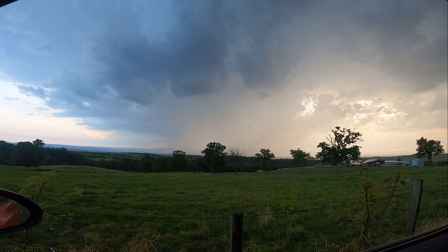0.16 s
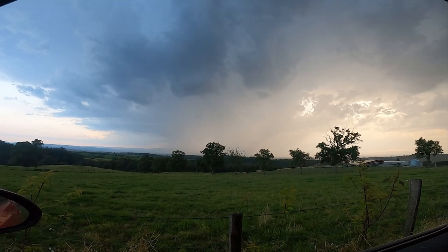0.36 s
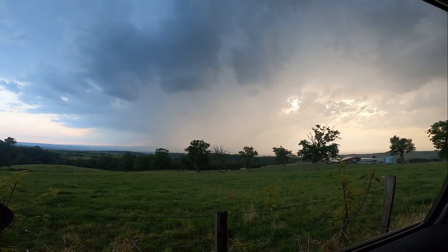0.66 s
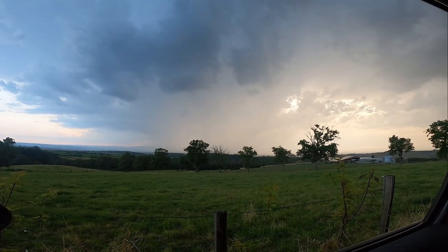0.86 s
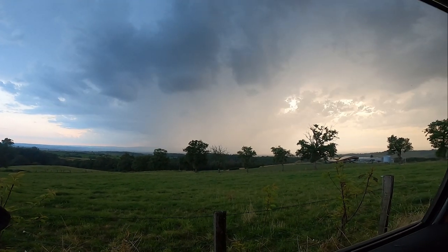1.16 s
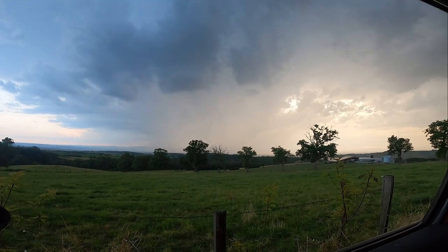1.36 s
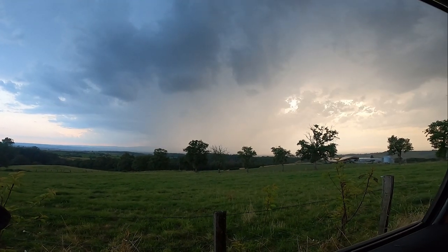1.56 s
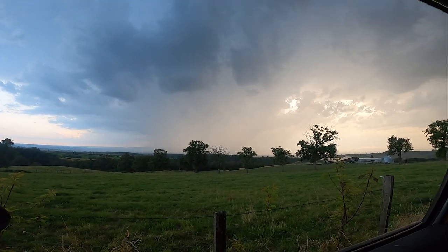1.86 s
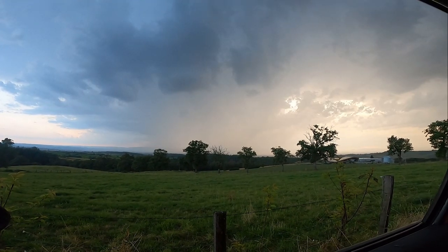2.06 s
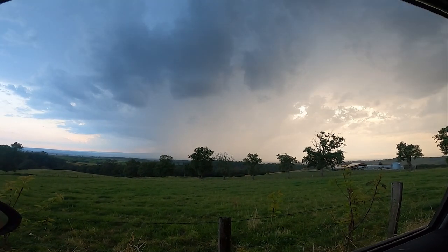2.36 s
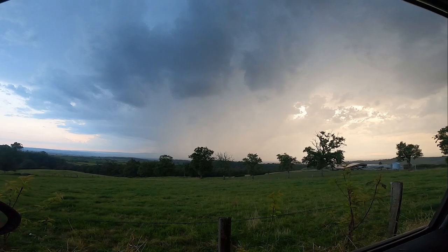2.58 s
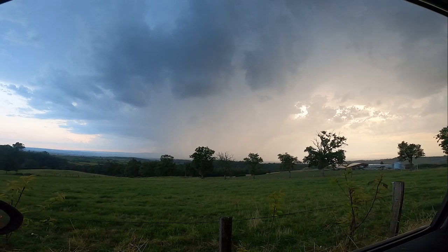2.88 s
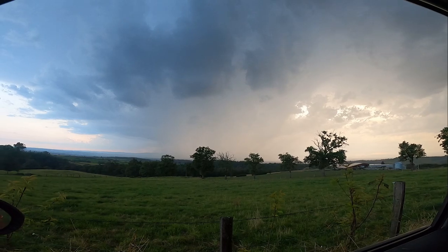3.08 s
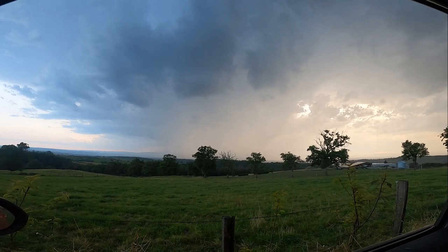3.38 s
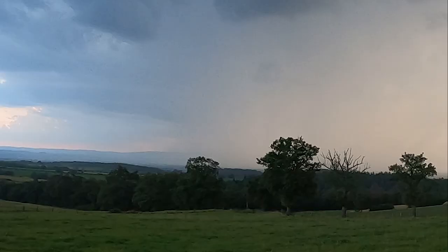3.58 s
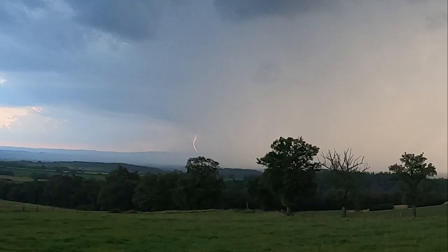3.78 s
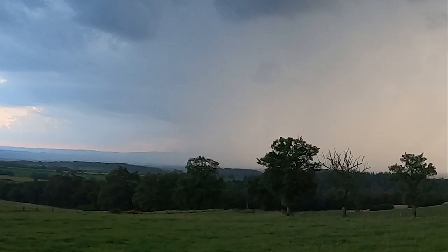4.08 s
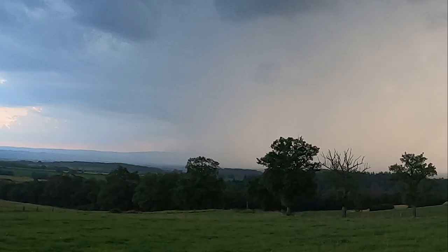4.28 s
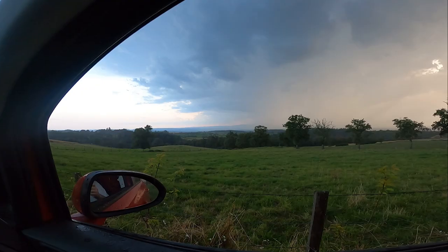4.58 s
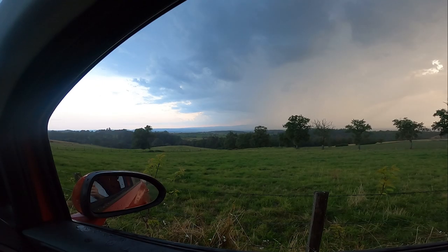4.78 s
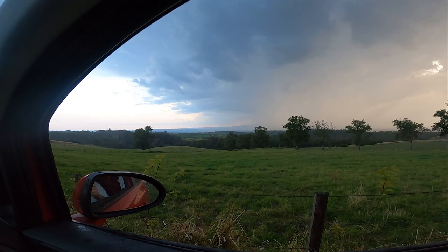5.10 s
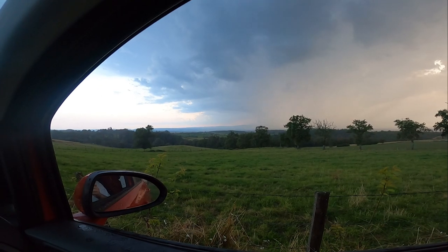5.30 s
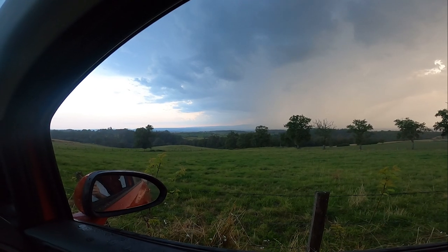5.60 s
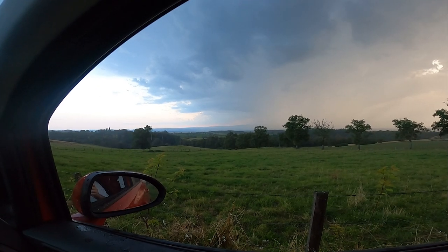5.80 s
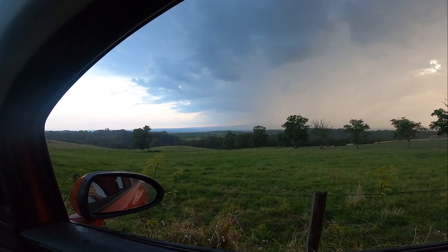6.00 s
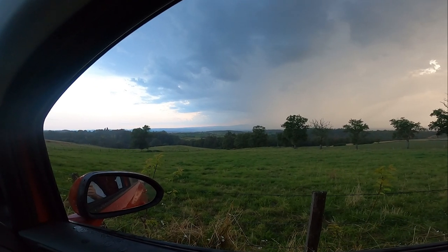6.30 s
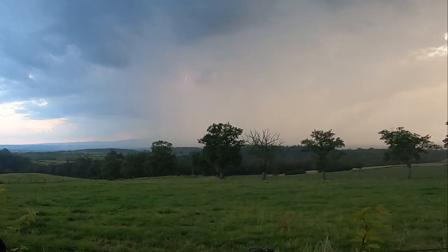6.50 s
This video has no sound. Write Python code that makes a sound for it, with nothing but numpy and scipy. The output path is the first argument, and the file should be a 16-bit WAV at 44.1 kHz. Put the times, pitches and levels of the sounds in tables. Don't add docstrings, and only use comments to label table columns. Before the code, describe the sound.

Sparse drops tick on car metal above faint distant rain; a hushed low mutter follows, then dense loud roof drumming cuts to a deep roll.

```python
import sys
import numpy as np
from scipy import signal
from scipy.fft import rfft, irfft, next_fast_len
from scipy.io import wavfile
from scipy.ndimage import uniform_filter1d, map_coordinates

SR = 44100
rng = np.random.default_rng(int(sys.argv[2]) if len(sys.argv) > 2 else 0)


def materialize(psi):
    bounded = np.clip(np.atleast_2d(psi).T, -1, 1)
    quanta = np.round(bounded * 32767).astype(np.int16)
    wavfile.write(sys.argv[1], SR, quanta)


def nominal_scale(level):
    x = np.asarray(level, float) / 20
    return 10 ** x


N = 293265


def unit(x):
    return x / np.sqrt(np.mean(x ** 2) + 1e-20)


def along(points, hz):
    f, v = np.transpose(points)
    return np.interp(np.log(hz + 1), np.log(f + 1), v)


def curves(rows):
    s, *cols = np.transpose(rows)
    return [np.interp(np.arange(N) / SR, s, c) for c in cols]


def wobble(knots_per_s):
    knots = rng.standard_normal(int(N * knots_per_s / SR) + 4)
    return map_coordinates(knots, [np.arange(N) * knots_per_s / SR])


def filtered(x, response):
    m = next_fast_len(N + SR // 2)
    return irfft(rfft(x, m) * response(np.fft.rfftfreq(m, 1 / SR)), m)[..., :N]


def below(x, edge_hz):
    return filtered(x, lambda hz: 1 / (1 + (hz / edge_hz) ** 4))


def rush(spectrum, patchy_db):
    z = signal.stft(rng.standard_normal(N), nperseg=512)[2]
    field = uniform_filter1d(rng.standard_normal(z.shape), size=5, axis=0)
    field = uniform_filter1d(field, size=6, axis=1)
    x = signal.istft(z * nominal_scale(patchy_db * unit(field)), nperseg=512)[1][:N]
    return unit(filtered(x, lambda hz: nominal_scale(along(spectrum, hz))))


# time in seconds, level in dB.
GUSTS_DB = [(0.0, -72), (0.06, -53), (0.25, -57.5), (0.3, -50), (0.41, -63), (1.06, -56.5), (1.09, -70.5),
            (1.34, -52.5), (2.0, -65.5), (2.07, -52), (2.15, -71.5), (2.2, -52.5), (2.53, -54),
            (2.69, -63.5), (2.72, -56), (3.38, -54.5), (3.43, -73.5), (3.47, -42.5)]
# frequency in Hz, density in dB per Hz.
BUFFET_SPECTRUM = [(7.1, -9.5), (12, 6.5), (54, 6), (120, -5.5), (160, -38.5), (260, -120)]


def wind_buffet():
    gust_db, = curves(GUSTS_DB)
    return nominal_scale(gust_db + 2.2) * rush(BUFFET_SPECTRUM, patchy_db=1.5)


# start in seconds, level in dB.
SHUDDERS_DB = [(0.018, -53.5), (.53, -54), (.68, -53), (1.0, -52), (1.31, -53), (1.36, -51), (1.58, -52),
               (1.74, -50), (2.2, -55.5), (2.5, -58.5), (2.78, -55.5), (3.46, -58)]


def shudder_power():
    rise_s, t60_s = .012, 0.29
    s, db = np.transpose(SHUDDERS_DB)[:, :, None]
    t = np.maximum(np.arange(N) / SR - s + 2 * rise_s, 0)
    swell = 1 - np.exp(-t / rise_s)
    return np.sum((nominal_scale(db - 60 * t / t60_s + 7) * swell) ** 2, axis=0)


# frequency in Hz, density in dB per Hz.
BOOM_SPECTRUM = [(59, -37), (100, -4), (118, -13), (151, -0.5), (172, 1.5), (248, -11), (330, -19),
                 (430, -38.5), (730, -120)]


def cabin_boom():
    drone_db, gust_share = -61, .3
    gust_db, = curves(GUSTS_DB)
    drone = nominal_scale(drone_db + gust_share * (gust_db - np.mean(GUSTS_DB, axis=0)[1]))
    return np.sqrt(drone ** 2 + shudder_power()) * rush(BOOM_SPECTRUM, patchy_db=1.0)


# time in seconds, level in dB.
FAR_SHOWER_DB = [
    (0, -69),
    (.45, -69),
    (.8, -66),
    (1.45, -65),
    (1.75, -67),
    (2.2, -64.5),
    (2.8, -63),
    (3.47, -65),
]
# frequency in Hz, density in dB per Hz.
FAR_RAIN_SPECTRUM = [(200, -8.5), (280, -2.5), (450, -11), (810, -17.5), (1230, -9), (2000, -15),
                     (3000, -18), (4000, -19.5), (7000, -17), (16000, -23.5)]


def far_rain():
    far_db, = curves(FAR_SHOWER_DB)
    return nominal_scale(far_db + 0.54 * wobble(25) + 1.8) * rush(FAR_RAIN_SPECTRUM, patchy_db=2.5)


# centre in Hz, width in Hz, level in dB.
PANEL_MODES = [
    (1110, 410, -1.5),
    (2900, 1200, -0.5),
    (5170, 6800, -13),
]


def contacts(blows):
    def ring(hz):
        total = 0
        for k, (centre, width, db) in enumerate(PANEL_MODES):
            band = 1j * hz * width
            total = total + (-1) ** k * nominal_scale(db) * band / (centre * centre - hz * hz + band)
        return total
    return filtered(blows, ring)


def splashes(rows, t60_s, swell_s):
    longer_db = 0.19
    return [(s, db, thud_db, spray_db, t60_s * nominal_scale(longer_db * thud_db), swell_s)
            for s, db, thud_db, spray_db in rows]


# frequency in Hz, density in dB per Hz.
SPLASH_SPECTRUM = [(130, -29), (220, -2.5), (454, 1.5), (800, -5.5), (1110, -5.5), (1700, -14), (2900, -12),
                   (5690, -20), (8000, -26.5), (16000, -42)]
SPLASH_SPLITS_HZ = (1096, 1880, 7600)


def drops(rows, crest_db, rough_db, tick_db):
    power, blows = np.zeros((4, N + SR)), np.zeros(N)
    t = np.arange(SR // 4) / SR
    for s, db, thud_db, spray_db, t60_s, swell_s in rows:
        life_s = np.clip(t60_s, .008, .3) * np.array([[1.5], [1.25], [.8], [.55]])
        rise_s = np.clip(swell_s, .0002, .03) * np.array([[1.6], [1.2], [.9], [.7]])
        burst = nominal_scale(-60 * t / life_s) * (1 - np.exp(-t / rise_s))
        heavy = np.clip(thud_db, -18, 6)
        balance_db = np.array([[thud_db], [0.49 * heavy - .3], [-.2 * heavy - 3], [spray_db + 11.5]])
        level_db = db - crest_db + balance_db
        tick_level_db = tick_db - 0.72 * heavy + np.array([[-6], [-.5], [1.2], [.4]])
        tick = nominal_scale(tick_level_db - 60 * t / 0.018) * (1 - np.exp(-t / .0002))
        power[:, round(s * SR):][:, :len(t)] += nominal_scale(2 * level_db) * (burst ** 2 + tick ** 2)
        blows[round((s + .0006) * SR)] = nominal_scale(db + tick_db - 0.33 * heavy + 2) * rng.choice([-1, 1])
    water = rush(SPLASH_SPECTRUM, patchy_db=1.5)
    layers = [0 * water] + [below(water, hz) for hz in SPLASH_SPLITS_HZ] + [water]
    parts = np.array([unit(layer) for layer in np.diff(layers, axis=0)])
    droplets = nominal_scale(rough_db * wobble(600))
    return unit(droplets) * np.sum(np.sqrt(power[:, :N]) * parts, axis=0) + contacts(blows)


# start in seconds, splash peak in dB, thud and spray in dB re splash.
ROOF_DROPS_DB = [(.0204, -58.5, -1.5, -10), (.2962, -56, 0, -10), (.5272, -45.5, 6.5, -14),
                 (.9547, -60, 11, 0), (.9702, -44.5, 1.5, -18), (1.0535, -48, 2.5, -8.5),
                 (1.1045, -48, 5, -18), (1.2195, -46, 4.5, -27), (1.3593, -45, 2.6, -17),
                 (1.407, -54, 9, -25), (1.5505, -40.5, 5, -14.5), (1.6591, -44, 3, -16.5),
                 (1.6726, -43, 6, -14.5), (1.7082, -40.5, 5.5, -15.5), (2.142, -59.5, 14, -24),
                 (2.3151, -53.5, -8, -26), (2.467, -52.5, -4, -29.5), (2.4823, -42.5, 3.5, -24),
                 (2.533, -59, -3, -5), (2.7412, -46, -15.5, -13.5), (2.7997, -52, 8, -8),
                 (2.8556, -41, 1, -25), (2.9576, -52, -2, -9), (3.166, -61, -12, -10),
                 (3.2735, -62, -4, -11), (3.3787, -66.5, -21, -13), (3.4366, -39, -9, -19)]
# start in seconds, splash peak in dB, thud and spray in dB re splash.
SILL_DROPS_DB = [(.2329, -59, -10, -30), (.3496, -59.5, -3, 2.1), (.379, -56, -3, -17),
                 (.3955, -41.5, -5.5, -18), (1.4455, -42.5, -9.5, -14), (1.5105, -44, -3.3, -15),
                 (1.7993, -53.5, -18.5, -18), (1.8642, -67, -9, 0), (2.0263, -52, -31, -33),
                 (2.0727, -61.5, -28.5, -8), (2.177, -43.5, -3, -14), (2.2072, -43, -6.3, -15),
                 (2.2453, -45, -4, -5.5), (2.2787, -39.5, -6, -17), (2.4009, -39.5, -11, -27),
                 (2.7611, -41.5, -9.5, -16), (2.8285, -51.5, -5.5, -24), (2.906, -40.5, -1.7, -13.5),
                 (3.0929, -42.5, -3.5, -8.5), (3.243, -64, -13, -12), (3.3044, -49.5, -8.5, -7.5),
                 (3.4825, -56, -2, -6)]


def scattered_drops():
    roof = splashes(ROOF_DROPS_DB, t60_s=0.13, swell_s=.0024)
    sill = splashes(SILL_DROPS_DB, t60_s=0.073, swell_s=0.0023)
    return drops(roof + sill, crest_db=7.0, rough_db=0.5, tick_db=-2.0)


# time in seconds, frequency in Hz, level in dB.
CHIRP = [
    (.197, 5100, -74),
    (.21, 5120, -68),
    (.225, 5330, -67),
    (.238, 5520, -65),
    (.246, 5400, -76),
]


def bird():
    hz, db = curves(CHIRP)
    now = np.arange(N) / SR
    sounding = (now > CHIRP[0][0]) * (now < CHIRP[-1][0])
    return nominal_scale(db) * np.sin(2 * np.pi * np.cumsum(hz) / SR) * sounding


# start in seconds, frequency in Hz, level in dB,
# T60 in seconds.
PANEL_PINGS = [
    (1.712, 706, -62, .85),
    (3.304, 1180, -48, .035),
    (1.221, 950, -49, .07),
    (4.5655, 1000, -27, .02),
    (1.284, 176, -42, .16),
    (2.856, 1300, -48, .07),
    (2.487, 1050, -49, .08),
    (1.8, 1300, -58, .04),
]


def pings():
    s, hz, db, t60_s = np.transpose(PANEL_PINGS)[:, :, None]
    t = np.maximum(np.arange(N) / SR - s, 0)
    return np.sum(nominal_scale(db - 60 * t / t60_s) * np.sin(2 * np.pi * hz * t), axis=0)


def drizzle():
    return wind_buffet() + cabin_boom() + far_rain() + scattered_drops() + pings() + bird()


def slowed(level, spectrum, lift_db):
    level_db, = curves(level)
    return nominal_scale(level_db + lift_db + 0.45 * wobble(5.6)) * rush(spectrum, patchy_db=0.8)


# time in seconds, level in dB.
MUTTER_DB = [
    (3.55, -71),
    (3.646, -71),
    (3.702, -73.5),
    (4.142, -73.5),
    (4.154, -70.5),
    (4.444, -77),
    (4.46, -70.5),
]
# frequency in Hz, density in dB per Hz.
SLOW_AIR_SPECTRUM = [(1, 0), (3, 1), (7, 5), (12, -11), (20, -22.5), (68, -19.5), (102, -24), (161, -30.5),
                     (364, -42), (417, -53), (640, -59.5), (756, -73.5), (1250, -72.5), (1500, -110)]


def slow_mutter():
    return slowed(MUTTER_DB, SLOW_AIR_SPECTRUM, lift_db=21)


# time in seconds, level in dB.
POUR_DB = [(4.54, -41.5), (4.626, -45.5), (4.698, -40.5), (4.856, -43), (4.942, -48.5), (4.968, -38.5),
           (5.008, -46.5), (5.03, -40.5), (5.16, -43.5), (5.19, -43.5), (5.294, -37.5), (5.436, -46.5),
           (5.462, -41), (5.528, -44.5), (5.712, -38), (5.76, -43), (6.1, -43), (6.37, -42)]
# frequency in Hz, density in dB per Hz.
ROOF_SPECTRUM = [(20, -9), (92, -22), (120, -14), (179, -1), (249, -7.5), (480, -4), (900, -5.5),
                 (1510, -8.5), (2950, -10.5), (5690, -15.5), (16000, -20.5)]


def roof_drumming():
    drum_db, = curves(POUR_DB)
    hiss_db = -48.5 + 0.63 * (drum_db - np.mean(POUR_DB, axis=0)[1])
    hits_per_s, patter_s = 420, .002
    hits = (rng.random(N) < hits_per_s / SR) * rng.exponential(size=N) ** 1.53
    patter = signal.lfilter([1], [1, -np.exp(-1 / (patter_s * SR))], hits)
    clumps = np.sqrt(1 + 1.02 * patter)
    roof = rush(ROOF_SPECTRUM, patchy_db=1.86)
    low = below(roof, edge_hz=1180)
    drum = unit(low * clumps ** 0.33) * nominal_scale(drum_db + 0.5)
    hiss = unit((roof - low) * clumps) * nominal_scale(hiss_db + 3.0)
    strength = rng.standard_normal(N) * rng.exponential(size=N) ** .35
    taps = strength * (rng.random(N) < 1100 / SR)
    crackle = unit(contacts(taps)) * nominal_scale(hiss_db - 5.5)
    return drum + hiss + crackle


# start in seconds, splash peak in dB, thud and spray in dB re splash.
HEAVY_DROPS_DB = [(4.5646, -27, -10, -9.5), (4.594, -39.5, -12.5, -7), (4.7437, -32, -8, -42),
                  (4.7591, -30, 5, -6.5), (4.844, -39, 8, -5), (4.8631, -32, 9.5, -13),
                  (4.9615, -29, -2.5, -14), (5.119, -33.5, -4.5, -19), (5.138, -43, 2, -22),
                  (5.1751, -29, 0, -24), (5.2457, -31, 0, -13), (5.453, -43, -25, -12),
                  (5.4832, -41, -14, -21), (5.5296, -48, -9, -16), (5.6364, -32, -6, -16),
                  (5.666, -35, -4, -17), (5.699, -30, 4, -20.5), (5.727, -44, 2, -21),
                  (5.895, -38, -11, -30), (5.9145, -36, -2.5, -15), (6.1287, -37, 10, -13),
                  (6.153, -41, 6.5, -11), (6.233, -34.5, -4, -10.5), (6.2715, -37.5, -13.5, -25),
                  (6.3327, -31, 5, -18), (6.3487, -27.5, 1.5, -29), (6.3754, -41.5, -11.5, -6.5)]


def heavy_drops():
    rows = splashes(HEAVY_DROPS_DB, t60_s=0.031, swell_s=.001)
    return drops(rows, crest_db=12, rough_db=1.5, tick_db=4.0)


def downpour():
    return pings() + roof_drumming() + heavy_drops()


# time in seconds, level in dB.
ROLL_DB = [
    (6.41, -40.5),
    (6.56, -39.5),
    (6.586, -45),
    (6.63, -37.5),
]
# frequency in Hz, density in dB per Hz.
SLOW_ROOF_SPECTRUM = [(7.1, -30.5), (12, 3), (86, -0.5), (136, -8), (167, -14.5), (286, -11.5), (324, -16),
                      (480, -21.5), (629, -32.5), (1200, -48.5), (1700, -77), (2210, -107), (3740, -120)]


def slow_roll():
    return slowed(ROLL_DB, SLOW_ROOF_SPECTRUM, lift_db=3.0)


# frequency in Hz, gain in dB.
CAMERA_RESPONSE = [(3050, 0), (3400, -4), (5750, -7), (6250, -12.5), (7750, -14.5), (8200, -21.5),
                   (12500, -25.5), (14400, -38.5), (15400, -78)]


def camera(x):
    return filtered(x, lambda hz: nominal_scale(along(CAMERA_RESPONSE, hz)))


# frequency in Hz, left over right in dB.
PORT_BALANCE = [(40, 24.5), (100, 17), (128, 5.5), (180, 2), (310, -1), (540, -3), (930, -1.5), (1610, 3.5),
                (2780, 6.5), (4300, 15), (4900, 32.5), (6500, 60.5), (9000, 66.5)]
# frequency in Hz, density in dB.
PORT_NOISE_SPECTRUM = [(15, -2), (80, -4), (130, -5.5), (1000, -22), (3000, -33), (5000, -35.5),
                       (6300, -40.5), (7000, -57.5), (15000, -56)]


def ports(mid, slow, own_db):
    def right(hz):
        return 1j * nominal_scale(-along(PORT_BALANCE, hz * slow))

    def both(hz):
        return 2 * np.array([np.ones_like(hz), right(hz)]) / (1 + right(hz))

    def noise_colour(hz):
        return nominal_scale(along(PORT_NOISE_SPECTRUM, hz * slow)) * (hz * slow < 15500)

    pair = filtered(mid, both)
    own = filtered(rng.standard_normal(N), noise_colour)
    pair[1] += nominal_scale(own_db) * unit(own)
    return pair


# start in seconds, fade in seconds.
CUTS_S = [
    (3.4843, .00002),
    (4.5222, .003),
    (6.3838, .0006),
]
# time in seconds, peak in dB.
SLIPS_DB = [
    (.5238, -48.5),
    (2.2243, -53.5),
]


def scene():
    shots = [ports(camera(drizzle()), slow=0.97, own_db=-64),
             ports(slow_mutter(), slow=16, own_db=-65.5),
             ports(camera(downpour()), slow=1, own_db=-85),
             ports(slow_roll(), slow=10.3, own_db=-76.0)]
    joined = shots[0]
    for shot, (s, fade_s) in zip(shots[1:], CUTS_S):
        ease = np.clip((np.arange(N) / SR - s) / fade_s, 0, 1) ** 2
        joined = (1 - ease) * joined + ease * shot
    for s, db in SLIPS_DB:
        joined[:, round(s * SR)] += nominal_scale(db)
    return joined


def roll_off(x):
    return signal.sosfilt(signal.butter(12, 15200, fs=SR, output="sos"), x)


def record(dry):
    mix = dry + nominal_scale(-98.5) * rng.standard_normal(dry.shape)
    return roll_off(mix)


dry = scene()
out = record(dry)
materialize(out)
```